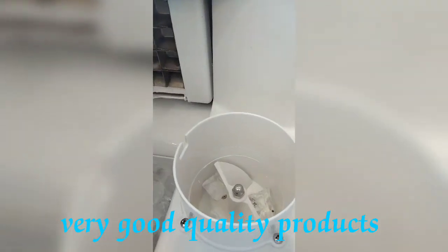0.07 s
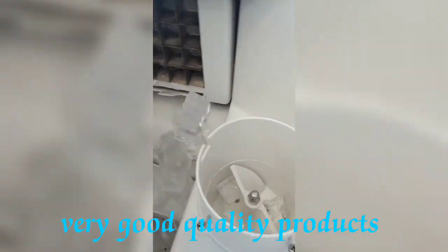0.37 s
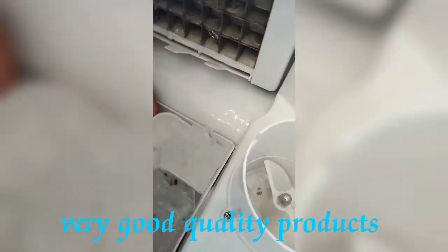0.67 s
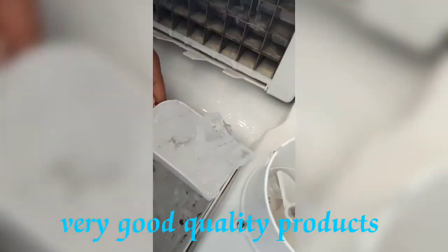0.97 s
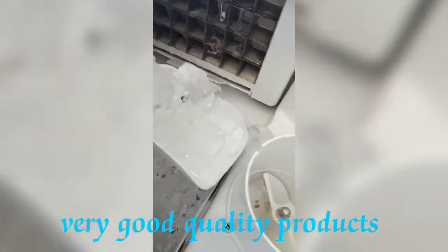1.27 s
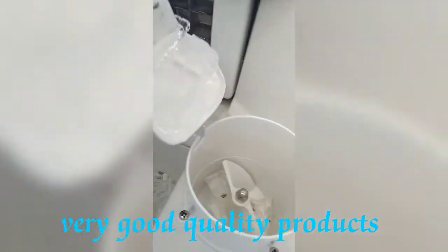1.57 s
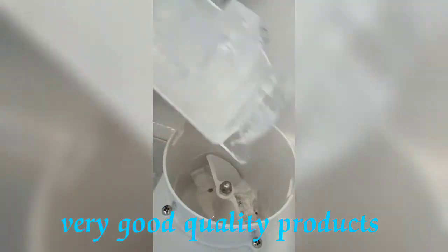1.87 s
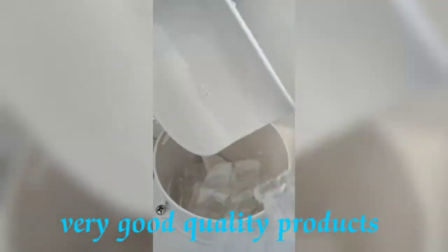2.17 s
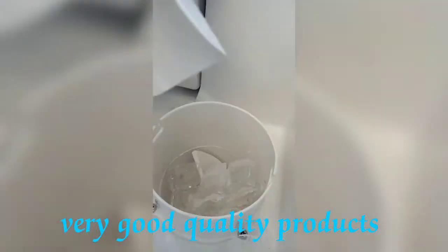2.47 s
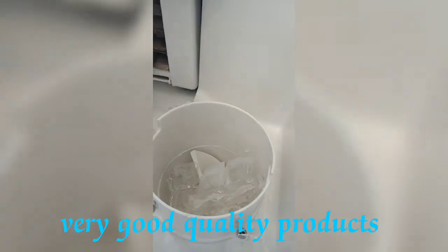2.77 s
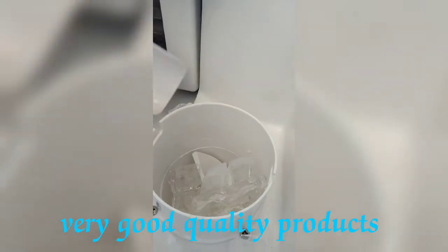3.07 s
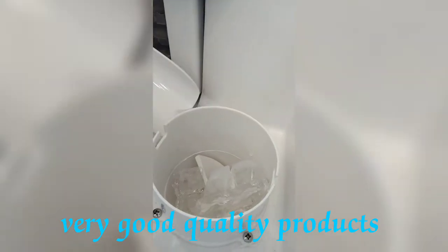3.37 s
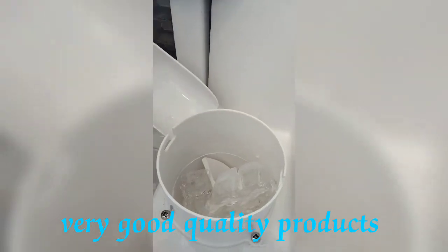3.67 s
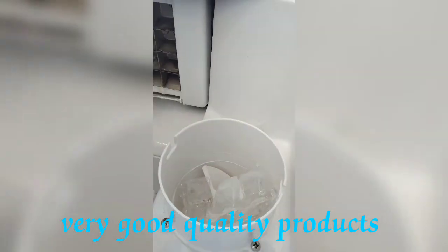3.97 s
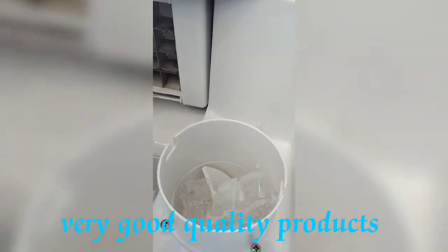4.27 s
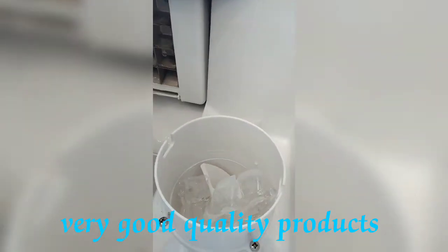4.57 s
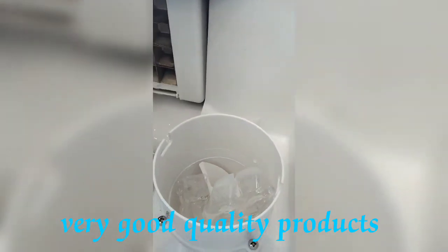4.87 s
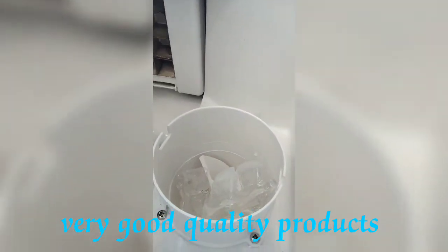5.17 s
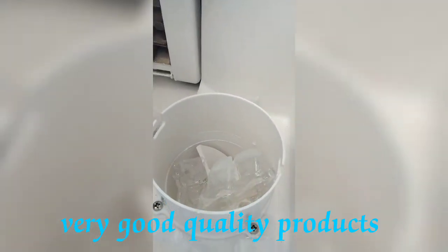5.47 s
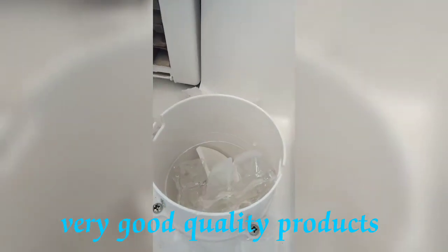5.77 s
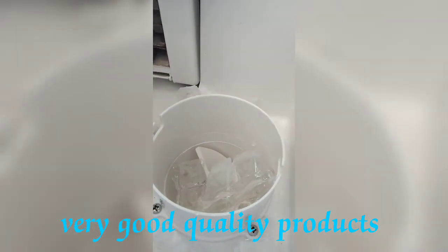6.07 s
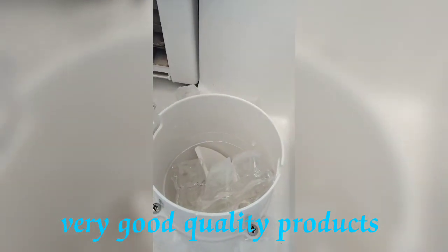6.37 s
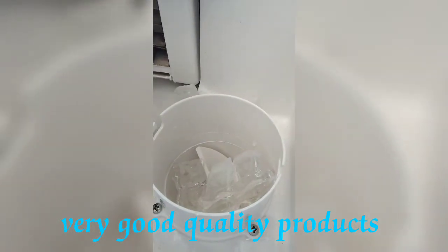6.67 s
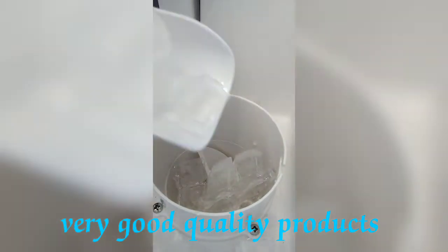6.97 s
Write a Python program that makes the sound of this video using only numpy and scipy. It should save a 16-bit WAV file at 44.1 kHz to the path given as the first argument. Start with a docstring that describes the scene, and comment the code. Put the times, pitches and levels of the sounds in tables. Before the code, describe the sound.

Close by, a plastic scoop digs into an ice machine's bin, and the cubes jostle, clink and knock against the plastic. After a brief lull, the load slides into a crusher's jar with a bright rattle and hollow knocks. A few scattered taps follow, then a second, longer dig and some last clacks. A compressor and fan hum faintly throughout in a small room.

```python
"""Ice cubes, dug from an ice machine's bin with a plastic scoop, tipped into a crusher's jar, dug again.
Cubes knock and jostle against scoop, bin and each other. Each contact is a noise burst in three bands
(boom, clack, crack) that rings bin, scoop and cube. Damped plastic modes give hollow knocks. As the load
lands, the jar resonates and the sliding ice sizzles. Compressor and fan hum close by, in a small room."""
import sys
import numpy as np
from scipy import signal
from scipy.fft import rfft, irfft, next_fast_len
from scipy.io import wavfile
from scipy.ndimage import uniform_filter1d

SR = 44100
rng = np.random.default_rng(int(sys.argv[2]) if len(sys.argv) > 2 else 0)


def file_out(sig):
    """Save sig as 16-bit WAV at sys.argv[1]."""
    # one column per channel
    cols = np.atleast_2d(sig).T
    # limit, then scale
    lim = np.clip(cols, -1, 1)
    pcm = np.round(lim * 32767).astype(np.int16)
    wavfile.write(sys.argv[1], SR, pcm)


N = 309141
TIME_S = np.arange(N) / SR
CONTACT_TIME_S = TIME_S[:8192]

# Distinct knocks of cubes and scoop. Each row: start in seconds, relative level in dB, boom share in dB,
# crack share in dB, ring pitch in Hz, rebound delay in seconds (no rebound up to 0.004).
KNOCKS = [ (0.068, -22, -2, -23, 1980, 0.036), (0.134, -13.5, -5, -8, 1960, 0.043),
          (0.292, -18.5, -21, -7, 1900, 0.028), (0.313, -6, -28, -2, 1960, 0.0023),
          (0.352, -4, -7, -6, 1970, 0.016), (0.484, -10.5, -22, -5, 1340, 0),
          (0.522, -8, -9, -4, 1420, 0.01), (0.564, -3, -27, -4.5, 1850, .02),
          (0.632, -8.5, -8, -3.5, 2760, 0.037), (0.76, -16, -20, 2, 1040, 0),
          (0.892, -17, -26, -3, 1050, 0.015), (0.937, -16, -12, -5.5, 1420, 0.011),
          (1.025, -6.5, -11, -8.5, 645, 0.018), (1.091, -10, -4.5, -6.5, 1160, .012),
          (1.218, -13.5, -7, -16, 970, 0.032), (1.274, -18, -22, -7, 1728, 0.0051),
          (1.354, -18.5, -12, -6, 1870, 0.0012), (1.429, -11, -12, -2, 1360, 0.0051),
          (1.459, -16, -14, -9.5, 1320, 0.0024), (1.836, -35, -24, -11, 3270, 0.014),
          (2.072, -7.5, -9.5, -9.5, 830, 0.035), (2.148, -8.5, -12, -9, 1310, 0.0058),
          (2.187, -8.5, -10, -7.5, 645, .008), (2.337, -16, 6, 4, 1320, 0.0046),
          (2.561, -11, -45, -4.5, 2780, 0.0054), (2.575, -11, -27.5, -14, 1770, .026),
          (3.045, -30, -7.5, -29.5, 1215, 0.0048), (3.313, -10, -3, -8, 940, 0),
          (3.353, -18, 0, -19, 870, 0), (3.493, -19, -8.5, -1, 1030, 0.04), (3.686, -15, -0.5, -18, 890, 0),
          (3.792, -15.5, -21.5, -2.5, 2120, 0), (4.225, -13.5, -5, -10, 1170, 0),
          (4.363, -16, -11, -11, 1710, 0.019), (4.483, -6.5, -9.5, -2.5, 670, 0.014),
          (4.544, -8, 0, -5.5, 570, 0.00091), (4.626, -6.5, 2, -4.5, 640, 0.046),
          (4.707, -4, -6, -7.5, 1050, 0.019), (4.752, -2, -26, -14, 650, 0.0031),
          (4.811, -8, -20, -8, 1250, 0.022), (4.979, -16, -3.5, -7, 1100, 0.0015),
          (5.13, -6.5, -1.5, -10.5, 886, 0.0037), (5.198, -14, -13, -11, 620, 0.005),
          (5.275, -7.5, -8, -14, 1270, 0.017), (5.351, -10.5, 3, -35, 1320, 0.00068),
          (5.526, -11, -22, -23, 1700, 0.0015), (5.552, -10.5, -32, -13, 1690, 0),
          (5.595, -12.5, -18, -9.5, 1730, 0.049), (5.782, -13, -40, -11, 1160, .043),
          (5.863, -12.5, -31, 4, 2990, 0), (5.97, -19, -11, -12.5, 900, .025),
          (6.055, -11, -26, -14, 1720, 0.016), (6.272, -19.5, -8, -32, 975, 0.0043),
          (6.311, -13.5, -9.5, -11, 1050, 0.043), (6.525, -31, -8, -3, 600, 0.004),
          (6.626, -26.5, -10, -19, 1500, 0.025), (6.715, -6, -12, -17, 1300, 0),
          (6.726, -10.5, -11.5, -5.5, 1700, 0), (6.833, -3, -3.5, -6.5, 1050, 0.0017),
          (6.985, -17, -5, -8, 1260, 0), (7.001, -12.5, -35, -5, 830, 0.022)]
# Shoves that move the heap. Each row: start, rise, hold and settling T60 in seconds,
# then relative level, boom share and crack share in dB.
SHOVES = [ (0.0, 0.008, 0.012, 0.17, -43.5, 0.5, -10.5), (0.128, 0.019, 0.084, 0.096, -34.5, 0, -6.5),
          (0.283, 0.064, 0.2, 0.79, -26.5, -0.5, -6), (0.658, 0.019, 0.11, 0.5, -27.5, -2.5, -6.5),
          (0.877, 0.064, 0.18, 0.35, -32.5, -1.5, -11), (1.97, 0.025, 0.17, 0.24, -44, -16, -1),
          (2.093, 0.055, 0.022, 0.19, -33.5, 0.5, -1.5), (2.19, 0.029, 0.13, 0.15, -28, -0.5, -7.5),
          (2.355, 0.015, 0.1, 0.17, -31.5, -26, -26), (2.553, 0.023, .04, 0.43, -43.5, -24, -12),
          (3.33, 0.011, .01, 0.28, -52.5, 13, -20), (3.43, 0.03, 0.19, .4, -55, -6, -4),
          (3.636, 0.021, 0.019, 0.13, -40.5, -10, -5), (4.383, 0.015, 0.032, 0.4, -28.5, -4.5, -6.5),
          (4.468, 0.04, 0.044, 0.48, -24.5, -3, -10), (4.6, 0.058, 0.18, 0.8, -22.5, -2, -8),
          (5.04, .015, 0.063, 0.55, -36, -9, -5.5), (5.094, 0.058, 0.1, 0.99, -30.5, -0.5, -9),
          (5.532, 0.037, .1, 0.24, -46.5, -0.5, -3), (5.739, 0.033, .34, 0.43, -44, -2.5, -5.5),
          (6.259, 0.022, 0.028, 0.34, -36, -10, -7)]
# Boom, clack and crack of a contact. Each row: low edge in Hz, high edge in Hz, base T60 in seconds,
# relative bin reflection in dB.
CONTACT_BANDS = [(45, 674, 0.092, -2.5), (505, 2590, 0.066, 0), (2520, 31000, 0.026, -1)]
# Spectrum of ice on plastic. Each row: frequency in Hz, gain in dB.
ICE_SPECTRUM = [(60, -35), (120, -19), (200, -5.5), (270, -1), (480, -7), (800, -8.5), (1300, -5.5),
                (2300, -13.5), (3300, -13.5), (5000, -23), (7200, -21.5), (9000, -31), (12500, -35),
                (15500, -30.5)]
# Cube ring ranges; a contact draws one pitch from each. Each row: low limit in Hz, high limit in Hz.
CLINK_RANGES = [(900, 2127), (1700, 3940), (3000, 7100)]
# Bin and scoop resonances. Each row: frequency in Hz, width in Hz, gain in dB.
BIN_MODES = [(267.3, 30, -1.5), (390, 10, -1.5), (644, 30, -1.5), (1071, 27, -6), (1436, 25, 0.5),
             (1890, 66, -8.5), (2880, 83, -0.5), (3628, 61, -6.5), (6780, 160, -12)]
# Hollow knocks on jar, bin and scoop. Each row: start in seconds, peak of the modes in dB, pitch in Hz,
# T60 in seconds.
HOLLOW_KNOCKS = [(0.372, -16.5, 269, 0.072), (0.586, -6, 2360, 0.011), (0.629, -19.5, 2840, .05),
                 (1.102, -15.5, 275, 0.096), (1.349, -24.5, 1770, 0.036), (2.1507, -9.5, 2480, 0.013),
                 (2.197, -15, 276, 0.12), (2.3, -9, 266, 0.092), (2.3814, -6, 1284, .022),
                 (2.4053, -7.5, 1410, 0.019), (2.4288, -7, 1250, 0.015), (2.464, -10.5, 1000, 0.0047),
                 (2.511, -15.5, 1330, 0.021), (2.5248, -11, 1220, 0.01), (2.5413, -8, 1280, .012),
                 (2.564, -15, 2877, 0.019), (3.3148, -19.5, 1814, .032), (3.688, -21, 906, 0.039),
                 (3.997, -26.5, 250, .095), (4.774, -13.5, 359, 0.053), (5.393, -20, 244, 0.082),
                 (5.527, -21.5, 1313, 0.085), (5.998, -29, 1073, .084), (6.312, -20, 1093, 0.24),
                 (6.698, -13.5, 1073, 0.05)]
# Modes of a hollow knock. Each row: multiple of the pitch, relative level in dB.
PLASTIC_MODES = [(1, 2.5), (1.13, -8.5), (1.381, -12.5), (1.6, -27)]
# Jar resonances, plus a broad bright sizzle of ice sliding in (last row).
# Each row: frequency in Hz, width in Hz, gain in dB.
LANDING_BANDS = [(89.3, 11, -4.5), (704, 16, 10), (910, 140, 3), (14000, 3500, 0)]
# Compressor and fan tones. Each row: frequency in Hz, rms level in dB.
HUM_TONES = [(166.9, -55.5), (209.9, -57.5), (231.5, -49), (296.1, -59.5), (339.1, -58.5), (592.2, -59),
             (694.4, -66.5), (845.2, -64)]
# Fan rush. Each row: frequency in Hz, relative spectral density in dB.
FAN_SPECTRUM = [(25, -30.5), (45, -22.5), (65, -5.5), (100, 4), (160, 4), (320, -0.5), (450, -1),
                (1300, -5), (1900, -12), (2600, -29.5), (3500, -43), (6000, -49), (15000, -47)]


def cube_knocks(gain_db=15, boom_db=2, crack_db=2, lag_s=0.0006, ring_width_hz=200, ring_db=4.5):
    """Each knock rings at its own pitch, heavy and dull or light and sharp; many rebound once."""
    out = np.zeros(N)
    sounds = contacts(count=2 * len(KNOCKS), t60_scale=1, touch_s=0.003, bin_db=-3, clink_db=4.5)
    for k, (start_s, level_db, boom_share_db, crack_share_db, ring_hz, rebound_s) in enumerate(KNOCKS):
        shares = from_db([boom_share_db + boom_db, 0, crack_share_db + crack_db])
        for bounce in range(2 if rebound_s > 0.004 else 1):
            bands = sounds[2 * k + bounce]
            bands = bands + resonances(bands, [(ring_hz, ring_width_hz, ring_db)])
            knock = unit_energy(shares @ unit_energy(bands))
            gain = from_db(level_db + gain_db - 4 * bounce)   # rebound 4 dB weaker
            add(out, start_s + lag_s + bounce * rebound_s, gain * knock)
    return out


def jostling_heap(spread_db=2.5, band_spread_db=5, levelling_s=0.045):
    """Cubes jostle in a stream of uneven contacts whose strength follows the shoves."""
    sounds = contacts(count=96, t60_scale=0.9, touch_s=0.0033, bin_db=-18.5, clink_db=6.5)
    stream = np.zeros((len(CONTACT_BANDS), N))
    starts_s = rng.uniform(0, N / SR, size=3500)   # about 500 per second
    strengths = np.minimum(rng.standard_normal((len(starts_s), len(CONTACT_BANDS) + 1)), 2)
    for k, (start_s, strength) in enumerate(zip(starts_s, strengths)):
        gains = from_db(spread_db * strength[0] + band_spread_db * strength[1:])
        add(stream, start_s, gains[:, None] * sounds[k % len(sounds)])
    running_power = np.abs(uniform_filter1d(stream ** 2, int(levelling_s * SR)))
    stream /= np.sqrt(running_power + 1e-12)
    return from_db([0, -0.5, -0.5]) @ (stream * shove_envelopes())


def shove_envelopes():
    """Heap amplitude per band: each shove rises, holds and dies away as the cubes settle."""
    power = 0
    for start_s, rise_s, hold_s, t60_s, level_db, boom_db, crack_db in SHOVES:
        rise = np.clip((TIME_S - start_s) / rise_s, 0, 1)
        settling = decay(np.maximum(TIME_S - start_s - rise_s - hold_s, 0), t60_s)
        gains = from_db([level_db + boom_db, level_db, level_db + crack_db])
        power = power + np.outer(gains, rise * settling) ** 2
    return np.sqrt(power)


def contacts(count, t60_scale, touch_s, bin_db, clink_db, bin_t60_s=0.089, rise_s=0.0011, clink_q=20):
    """Faces chatter while touching, crowded modes die fast, the bin reflects. Shape: count, band, time."""
    t, bands = CONTACT_TIME_S, []
    noise = rng.standard_normal((count, len(CONTACT_BANDS), len(t)))
    attack = 1 - np.exp(-t / rise_s)
    for k, (low_hz, high_hz, t60_s, reflection_db) in enumerate(CONTACT_BANDS):
        direct = decay(np.maximum(t - touch_s, 0), t60_s * t60_scale)
        reflected = from_db(bin_db + reflection_db) * decay(t, bin_t60_s)
        bands.append(bandpass(noise[:, k] * (direct + reflected) * attack, low_hz, high_hz))
    sounds = colour(np.stack(bands, axis=1), ICE_SPECTRUM)
    sounds = sounds + resonances(sounds, BIN_MODES)
    # Cubes differ in size and in how they are held, so no two clink alike.
    clinks_hz = np.exp(rng.uniform(*np.log(CLINK_RANGES).T, (count, len(CLINK_RANGES))))
    for sound, pitches_hz in zip(sounds, clinks_hz):
        sound += resonances(sound, [(hz, hz / clink_q, clink_db) for hz in pitches_hz])
    return unit_energy(sounds)


def hollow_knocks(rise_cycles=0.5, scatter_db=-15, echo_db=-13, typical_echo_s=0.0097):
    """Damped plastic modes, a scatter of weaker ones and a reflection off the machine's wall."""
    out, t = np.zeros(N), CONTACT_TIME_S
    sounds = contacts(count=len(HOLLOW_KNOCKS), t60_scale=0.89, touch_s=0.0031, bin_db=-45, clink_db=-7.5)
    for (start_s, peak_db, pitch_hz, t60_s), bands in zip(HOLLOW_KNOCKS, sounds):
        modes = sum(from_db(db) * np.sin(2 * np.pi * ratio * pitch_hz * t) for ratio, db in PLASTIC_MODES)
        attack = 1 - np.exp(-t * pitch_hz / rise_cycles)
        modes = bandpass(modes * decay(t, t60_s) * attack, pitch_hz / 3, 17000)
        scatter = bandpass(from_db([-14, 0, -3]) @ bands, 100, 13 * pitch_hz)   # low thumps lack treble
        scatter *= from_db(scatter_db) / np.abs(scatter).max()
        knock = from_db(peak_db) * (modes / np.abs(modes).max() + scatter)
        add(out, start_s, knock)
        add(out, start_s + typical_echo_s * rng.uniform(0.83, 1.2), from_db(echo_db) * knock)
    return out


def load_landing(ice, start_s=2.18, end_s=2.39):
    """Jar resonances, plus a broad bright sizzle of ice sliding in as the load lands."""
    landing = (TIME_S > start_s) & (TIME_S < end_s)
    return resonances(ice * landing, LANDING_BANDS)


def machine_hum(fan_rms_db=-50, waver=0.15):
    """Slightly wavering motor tones over the rush of the fan."""
    rush = colour(rng.standard_normal(N), FAN_SPECTRUM)
    out = from_db(fan_rms_db) * rush / np.sqrt(np.mean(rush ** 2))
    knots_s = np.linspace(0, N / SR, num=40)
    for hz, rms_db in HUM_TONES:
        drifts = waver * rng.standard_normal((2, len(knots_s)))
        swell, sway_rad = [np.interp(TIME_S, knots_s, drift) for drift in drifts]
        phase_rad = 2 * np.pi * (hz * TIME_S + rng.random()) + sway_rad
        out += np.sqrt(2) * from_db(rms_db) * (1 + swell) * np.sin(phase_rad)
    return out


def room_reverb(x, low_t60_s=0.51, treble_t60_s=0.56, split_hz=3500, treble_db=-1, build_s=0.0037):
    """A diffuse two-band tail that builds up over the first reflections."""
    t, noise = TIME_S[:SR], rng.standard_normal((2, SR))
    low = bandpass(noise[0], 160, split_hz) * decay(t, low_t60_s)
    treble = from_db(treble_db) * bandpass(noise[1], split_hz, 12450) * decay(t, treble_t60_s)
    tail = (low + treble) * (1 - np.exp(-t / build_s))
    return signal.fftconvolve(x, unit_energy(tail))[:N]


def resonances(x, bands):
    """Parallel two-pole band-passes."""
    out = 0
    for hz, width_hz, gain_db in bands:
        r = np.exp(-np.pi * width_hz / SR)   # pole radius
        numerator = [(1 - r * r) / 2, 0, (r * r - 1) / 2]
        denominator = [1, -2 * r * np.cos(2 * np.pi * hz / SR), r * r]
        out = out + from_db(gain_db) * signal.lfilter(numerator, denominator, x)
    return out


def colour(x, spectrum):
    """Minimum-phase filter through (Hz, dB) points; no pre-ringing."""
    size = next_fast_len(x.shape[-1]) * 2
    hz, db = np.transpose(spectrum)
    grid_hz = np.arange(size // 2 + 1) * SR / size
    gain = from_db(np.interp(np.log(grid_hz + 1), np.log(hz), db))
    cepstrum = irfft(np.log(gain))
    cepstrum[1:size // 2] *= 2
    cepstrum[size // 2 + 1:] = 0
    return irfft(rfft(x, size) * np.exp(rfft(cepstrum)))[..., :x.shape[-1]]


def bandpass(x, low_hz, high_hz):
    """Causal band-pass."""
    edges_hz = [max(low_hz, 10), min(high_hz, 0.45 * SR)]
    return signal.sosfilt(signal.butter(3, edges_hz, "band", fs=SR, output="sos"), x)


def decay(t, t60_s):
    """Envelope falling 60 dB in t60_s."""
    return np.exp(-np.log(1000) * t / t60_s)


def from_db(db):
    """Decibels to gain."""
    return 10 ** (np.asarray(db) / 20)


def unit_energy(x):
    """Scale to energy 1 along time."""
    return x / np.linalg.norm(x, axis=-1, keepdims=True)


def add(out, start_s, sound):
    """Mix a sound in at start_s."""
    at = int(np.clip(start_s * SR, 0, N - 1))
    out[..., at:at + sound.shape[-1]] += sound[..., :N - at]


def scene(room_db=-15):
    """Close ice, jar, room and machine; mono."""
    ice = cube_knocks() + hollow_knocks() + jostling_heap()
    ice = ice + load_landing(ice)
    return (ice + from_db(room_db) * room_reverb(ice) + machine_hum())[None]


def record(dry):
    """Steep low-pass at 15.8 kHz."""
    return signal.sosfilt(signal.ellip(10, 0.2, 80, 15800, fs=SR, output="sos"), dry)


dry = scene()
out = record(dry)
file_out(out)
```